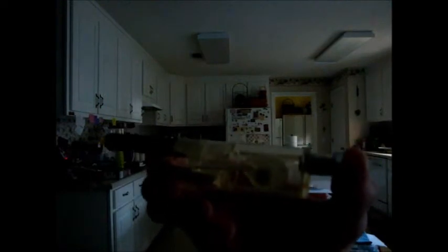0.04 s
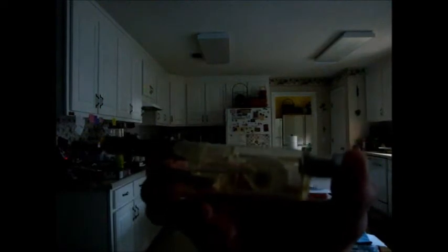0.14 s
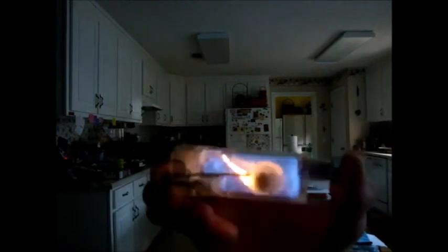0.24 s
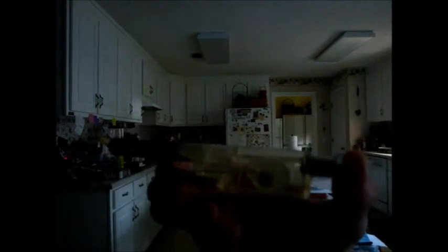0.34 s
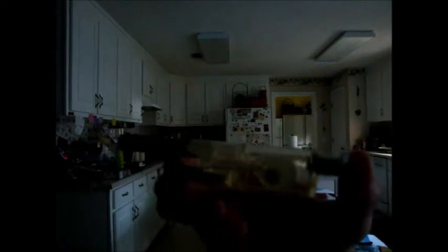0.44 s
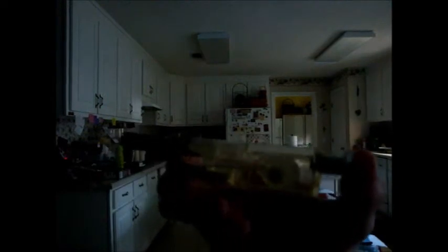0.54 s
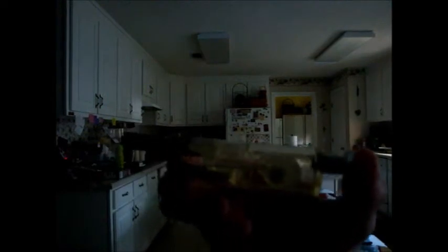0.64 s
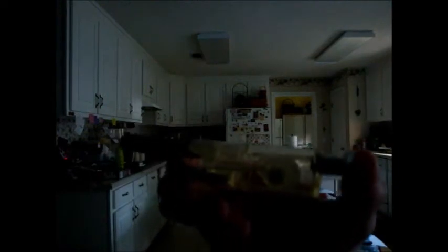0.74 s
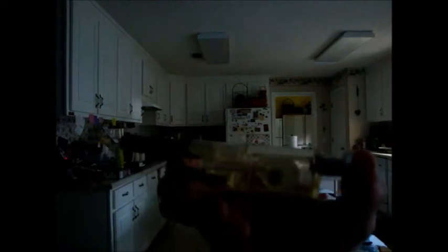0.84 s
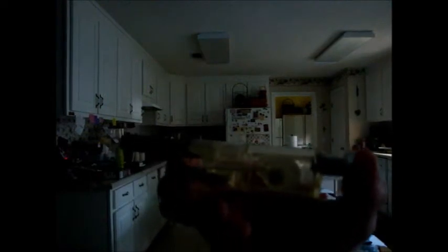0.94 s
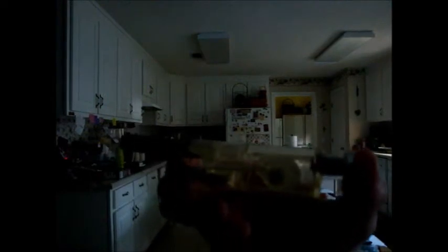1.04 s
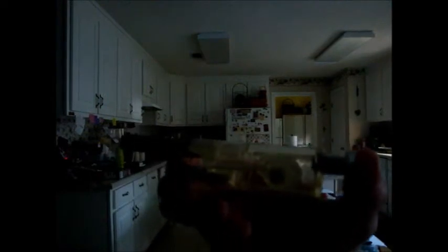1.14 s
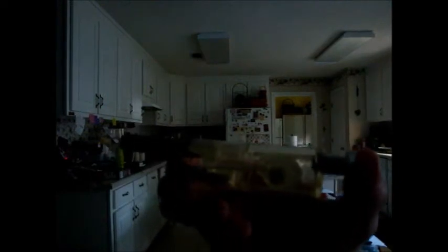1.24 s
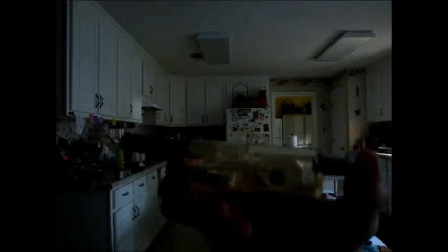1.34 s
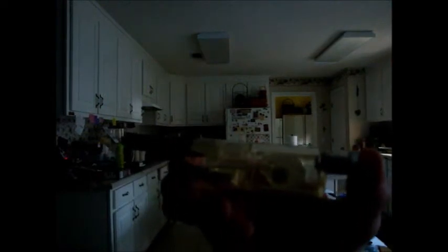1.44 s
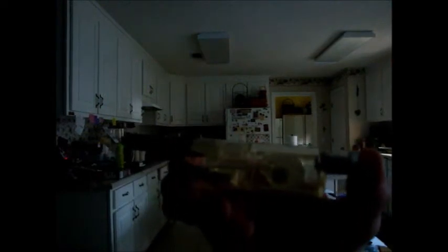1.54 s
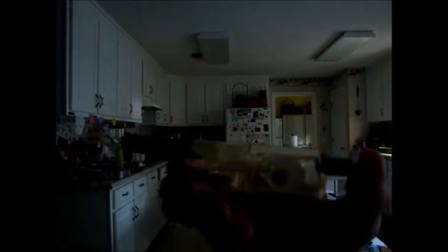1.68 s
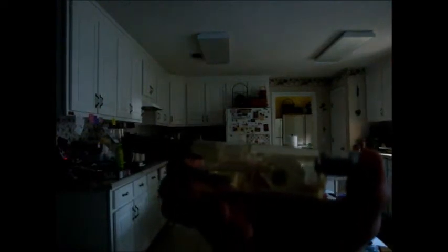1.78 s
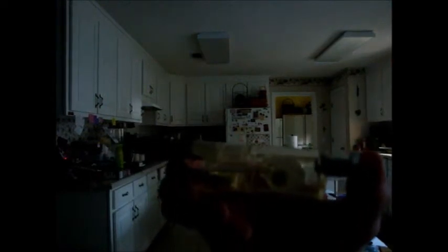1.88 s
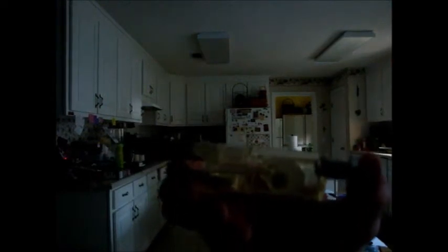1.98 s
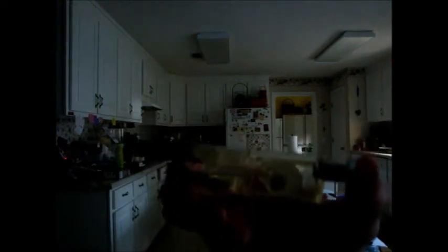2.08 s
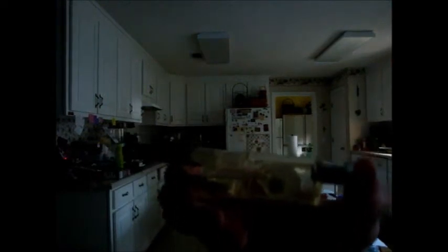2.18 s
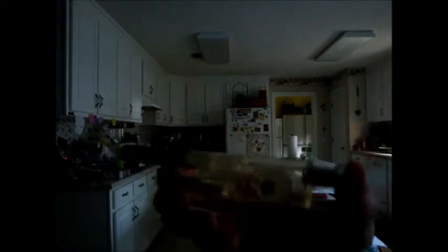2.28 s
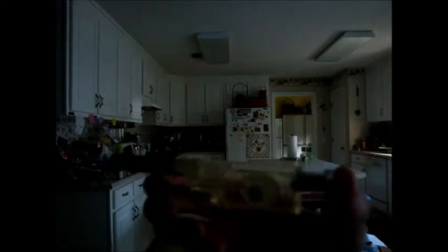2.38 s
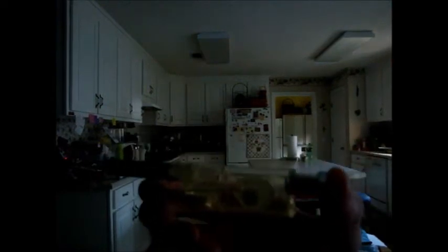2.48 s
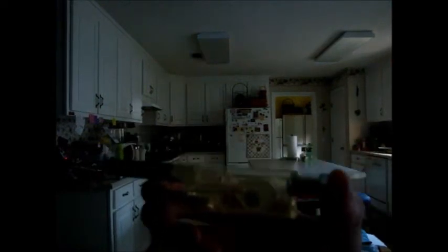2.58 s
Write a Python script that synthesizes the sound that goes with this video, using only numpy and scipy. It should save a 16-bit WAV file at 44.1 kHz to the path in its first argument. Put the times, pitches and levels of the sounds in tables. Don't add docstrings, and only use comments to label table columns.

```python
import sys
import numpy as np
from scipy import signal
from scipy.fft import rfft, irfft, next_fast_len
from scipy.io import wavfile
from scipy.ndimage import uniform_filter1d, map_coordinates

SR = 44100
rng = np.random.default_rng(int(sys.argv[2]) if len(sys.argv) > 2 else 0)


def field_ratio(decibels):
    return 10 ** (np.asarray(decibels, dtype=float) / 20)


def transcribe(u):
    v = np.clip(np.atleast_2d(u).T, -1, 1)
    q = np.round(v * 32767).astype(np.int16)
    wavfile.write(sys.argv[1], SR, q)


N = 114660
T = np.arange(N) / SR
GATE_EDGE_S = .004

# start in seconds, level in dB, rise in seconds.
POPS = [
    (.229, -6, .0001),
    (.2444, 0, .00016),
    (.2458, -4, .0001),
    (.2616, -2, .00007),
]
# start in seconds, level in dB, rise in seconds.
PUSH = (.2446, -17, .0003)
# centre in Hz, width in Hz, level in dB.
BARREL = [(2700, 300, 7), (560, 350, 2)]
# start in seconds, length in seconds, level in dB.
SPIT = (.2275, .02, -15)
# frequency in Hz, level in dB per Hz.
SPIT_HUE = [(300, -40), (1900, -16), (2900, -24), (3660, 0), (4400, -12), (6200, -6), (7500, -9),
            (10300, -30), (13000, -60)]
# frequency in Hz, level in dB per Hz.
BLAST_HUE = [(250, -46), (450, -28), (800, -17), (1700, -6), (2550, 0), (3600, -6), (6500, -11),
             (10300, -22), (13000, -60)]


def cannon():
    pops = sum(pressure(*pop) for pop in POPS)
    muzzle = .6 * pops + 1.2 * filtered(pops, body(BARREL))
    start, length, db = SPIT
    spit = field_ratio(db) * noise(SPIT_HUE) * gate(start + GATE_EDGE_S / 2, length - GATE_EDGE_S)
    blast = roar(BLAST_HUE, start=.245, db=-12, rise=.009, hold=.095)
    return muzzle + pressure(*PUSH) + spit + blast


def pressure(start, db, rise):
    u = np.clip(T - start, 0, None) / rise
    return -field_ratio(db) * u * (2 - u) * np.exp(1 - u)


# frequency in Hz, T60 in seconds.
KITCHEN = [(250, .25), (600, .5), (1200, .6), (2500, .47), (4000, .52), (10000, .48)]
# frequency in Hz, share of the hold.
TREBLE_HOLD = [(400, .7), (1000, 1), (2500, 1), (6000, .8), (10000, .6)]


def roar(hue, start, db, rise, hold):
    hz, t, z = signal.stft(noise(hue), SR, nperseg=256)
    hold_s = hold * along(TREBLE_HOLD, hz)[:, None]
    t60 = along(KITCHEN, hz)[:, None]
    fade = field_ratio(-60 * np.clip(t - start - hold_s, 0, None) / t60)
    tail = signal.istft(z * fade, SR, nperseg=256)[1][:N]
    build_up = 1 - np.exp(-np.clip(T - start, 0, None) / rise)
    crackle_db = .7 * wobble(count=900)
    return field_ratio(db + crackle_db) * tail * build_up


# frequency in Hz, level in dB per Hz.
STRIKE_HUE = [(300, -50), (500, -23), (850, -22), (1340, -7), (2200, -9), (3500, -6), (6050, -7),
              (10300, -16), (13000, -50)]
# frequency in Hz, level in dB, T60 in seconds.
PAN = [(1329, -36, .8), (1373, -32, .9), (1290, -41, .8), (1439, -39, .4)]
# frequency in Hz, level in dB per Hz.
LANDING_HUE = [(300, -30), (700, -12), (1100, -6), (1800, -5), (4000, -4), (7000, -3), (9400, -6),
               (10300, -12), (13000, -50)]


def shot():
    strike_s = .443
    ring_s = strike_s + .01
    modes = sum(field_ratio(db) * decay(ring_s, t60) * np.sin(2 * np.pi * hz * T) for hz, db, t60 in PAN)
    onset = np.clip((T - ring_s) / .0015, 0, 1)
    ring = modes * field_ratio(2.5 * wobble(count=90)) * onset
    strike = roar(STRIKE_HUE, start=strike_s, db=-17.5, rise=.011, hold=.035)
    landing = roar(LANDING_HUE, start=.947, db=-29.5, rise=.002, hold=.04)
    return strike + ring + landing


# start in seconds, level in dB, T60 in seconds.
CLICKS = [
    (.948, -25, .05),
    (.951, -26, .03),
    (1.664, -32, .014),
    (1.667, -33, .014),
    (2.2922, -38, .03),
    (2.2943, -18, .016),
    (2.3307, -43, .008),
]
# centre in Hz, width in Hz, level in dB.
TRIGGER = [(2200, 450, -3), (3700, 380, 3), (6200, 900, -8), (9500, 1200, -10)]
# start in seconds, level in dB.
KNOCKS = [
    (2.331, -36),
    (2.347, -35),
    (2.54, -42),
]
# start, rise and fall in seconds, level in dB.
RUB = (2.368, .045, .055, -45)
# centre in Hz, width in Hz, level in dB.
GRIP = [(1050, 200, -5), (1900, 300, -11), (2740, 50, 2), (3700, 300, -15)]


def hand():
    rattle = sum(field_ratio(db) * decay(s, t60) for s, db, t60 in CLICKS) * resonant_noise(TRIGGER)
    when, peak_db, _ = np.transpose(CLICKS)
    snap = filtered(kicks(when, peak_db + 23), body(TRIGGER))
    clicks = field_ratio(-8) * rattle + snap
    knocks = sum(field_ratio(db) * decay(s, .035) * np.sin(2 * np.pi * 430 * (T - s)) for s, db in KNOCKS)
    start, rise, fall, db = RUB
    stroke = np.interp(T, [start, start + rise, start + rise + fall], [0, 1, 0])
    slide = field_ratio(db) * stroke * resonant_noise(GRIP)
    echo = roar(LANDING_HUE, start=2.3, db=-51, rise=.01, hold=.03)
    return clicks + knocks + slide + echo


# start in seconds, end in seconds, level in dB.
FOCUS = [
    (1.584, 1.64, -47),
    (1.884, 1.925, -44),
    (1.925, 2.16, -39.5),
    (2.16, 2.175, -46),
]
# centre in Hz, width in Hz, level in dB.
STEP = [(5500, 700, 0), (4400, 600, -9), (8500, 2500, -15)]


def focus():
    times = 1.5667 + np.arange(40) / 59.9
    size_db = 1.4 * rng.standard_normal(len(times))
    steps = []
    for start, end, db in FOCUS:
        for step, size in zip(times, size_db):
            if start - .004 < step < end - .004:
                steps.append((step, db + size))
    buzz = sum(field_ratio(db) * decay(s, .016) for s, db in steps) * rng.standard_normal(N)
    when, db = np.transpose(steps)
    return filtered(field_ratio(7) * buzz + kicks(when, db + 25), body(STEP))


# time in seconds, level in dB.
AIR = [(0, -49), (.23, -48), (.3, -55), (.87, -55), (1.14, -53), (1.38, -53), (1.98, -49), (2.6, -48)]
# frequency in Hz, level in dB per Hz.
ROOM_HUE = [(20, -32), (60, -23), (120, -14), (180, -15), (260, -8), (430, -5), (900, -6), (1700, -13),
            (4000, -24), (8000, -60)]
# centre in Hz, width in Hz, level in dB.
DUCTS = [(400, 40, 0), (435, 20, -2), (740, 50, -4)]
# frequency in Hz, level in dB over the air.
FRIDGE = [(241, -6), (890, -8)]
# frequency in Hz, level in dB per Hz.
HISS_HUE = [(1500, -6), (3000, 0), (6000, 0), (8500, -2), (10000, -1)]


def room_tone():
    drone = unit(filtered(rng.standard_normal(N), lambda hz: body(DUCTS)(hz) ** 2))
    hum = 0
    for hz, db in FRIDGE:
        level = field_ratio(db + 1.5 * wobble(count=40))
        hum = hum + level * np.sin(2 * np.pi * hz * T + .4 * wobble(count=40))
    gain_db = np.interp(T, *np.transpose(AIR)) + .8 * wobble(count=30)
    air = field_ratio(gain_db) * (noise(ROOM_HUE) + field_ratio(-9) * drone + hum)
    return air + field_ratio(-56) * noise([(300, -40)] + HISS_HUE)


def unit(x):
    return x / np.sqrt(np.mean(x ** 2) + 1e-20)


def along(points, hz):
    f, v = np.transpose(points)
    return np.interp(np.log(hz + 1), np.log(f + 1), v)


def filtered(x, response):
    m = next_fast_len(N + SR // 4)
    return irfft(rfft(x, m) * response(np.fft.rfftfreq(m, 1 / SR)), m)[:N]


def body(peaks):
    def response(f):
        total = 0
        for k, (centre, width, db) in enumerate(peaks):
            damping = 1j * f * width
            total = total + (-1) ** k * field_ratio(db) * damping / (centre * centre - f * f + damping)
        return total
    return response


def noise(hue):
    return unit(filtered(rng.standard_normal(N), lambda hz: field_ratio(along(hue, hz))))


def resonant_noise(peaks):
    return unit(filtered(rng.standard_normal(N), body(peaks)))


def gate(start, length):
    return np.clip(np.minimum(T - start, start + length - T) / GATE_EDGE_S + .5, 0, 1)


def decay(start, t60):
    return (T >= start) * field_ratio(-60 * np.clip(T - start, 0, None) / t60)


def kicks(times, db):
    return np.bincount(np.round(np.asarray(times) * SR).astype(int), field_ratio(db), N)


def wobble(count):
    return map_coordinates(rng.standard_normal(count + 1), [np.linspace(0, count, N)])


def scene():
    return np.tile(cannon() + shot() + hand() + focus() + room_tone(), (2, 1))


# start in seconds, length in seconds, lowest Hz affected, threshold over the mean level.
DULL = [(.04, .02, 2500, 1.4), (.1, .015, 2500, 1.3), (.162, .025, 3000, 1.5), (.212, .008, 5500, 1.8),
        (.252, .008, 3300, 1.05), (.34, .013, 4800, 1.8), (.428, .014, 6000, 1.3), (1.15, .015, 1500, 1.5),
        (1.63, .03, 7000, 1.3), (1.677, .02, 3000, 2.1), (1.765, .02, 3000, 1.2), (1.92, .02, 2500, 1.1),
        (2.065, .015, 2500, 1.2), (2.195, .035, 2000, 1.35), (1.93, .24, 6300, .95)]


def coarse(x):
    hz, t, z = signal.stft(x, SR, nperseg=768)
    limit = np.outer(hz > 2000, .55 + .15 * rng.standard_normal(len(t)))
    for start, length, above_hz, share in DULL:
        inside = abs(t - start - length / 2) < length / 2
        limit = np.maximum(limit, share * np.outer(hz > above_hz, inside))
    mean = np.sqrt(abs(uniform_filter1d(abs(z) ** 2, size=41, axis=0)))
    kept = np.where(abs(z) > limit * mean, 1, .08)
    return signal.istft(z * kept, SR, nperseg=768)[1][:N]


# start in seconds, length in seconds, level of the lines in dB, share of sound dropped.
THIN = [
    (.955, .017, -35, .95),
    (2.299, .014, -50, .93),
    (.339, .014, -22, .7),
    (2.278, .012, -55, .93),
]
KEPT_HZ = [
    [1420, 2529, 3404, 4133, 6973, 8084],
    [380, 890, 2132, 3300, 7714, 7870],
    [1440, 2100, 2550, 3300, 4000, 5400],
    [241, 410, 720, 890, 1250, 1700],
]


def thinned(x):
    for (start, length, db, drop), lines in zip(THIN, KEPT_HZ):
        kept = sum(np.sin(2 * np.pi * (hz * T + rng.random())) for hz in lines)
        x = x + gate(start, length) * (field_ratio(db) * kept - np.clip(drop, 0, 1) * x)
    return x


def top_cut(x):
    return signal.sosfilt(signal.butter(12, 11280, fs=SR, output="sos"), x)


def record(dry):
    ceiling, knee = .95, 5
    x = dry[0] / (1 + abs(dry[0] / ceiling) ** knee) ** (1 / knee)
    x = thinned(coarse(x))
    x = filtered(x, lambda hz: 1 / (1 + np.minimum(hz / 10150, 1.5) ** 110))
    return top_cut(np.tile(x, (2, 1)))


dry = scene()
out = record(dry)
transcribe(out)
```